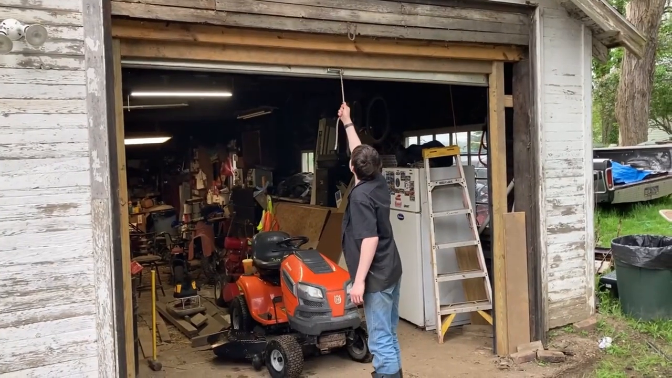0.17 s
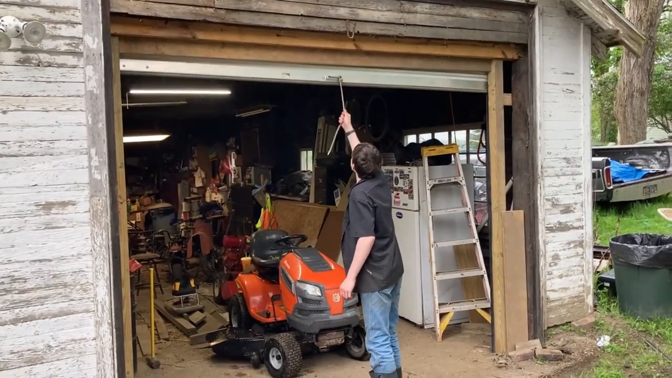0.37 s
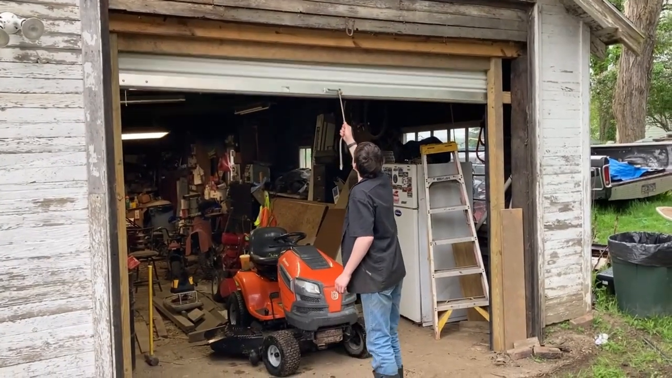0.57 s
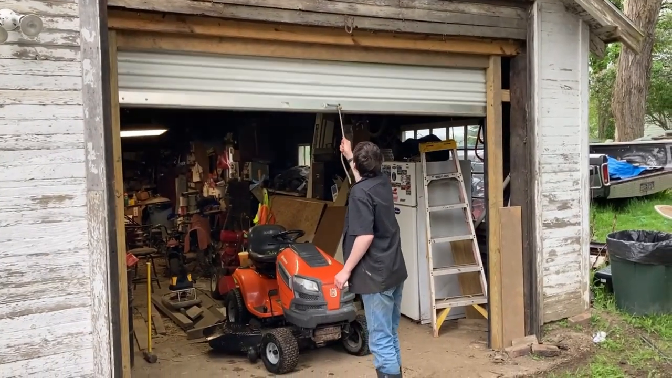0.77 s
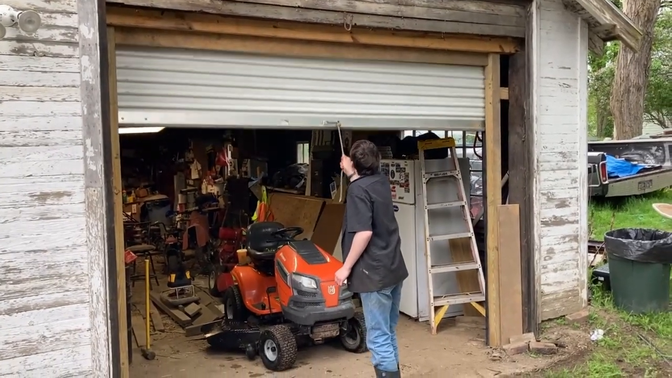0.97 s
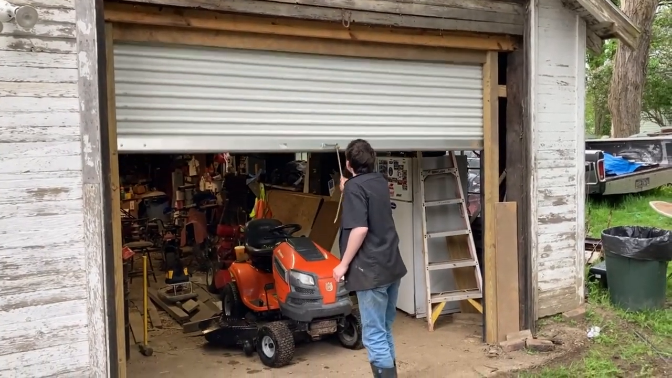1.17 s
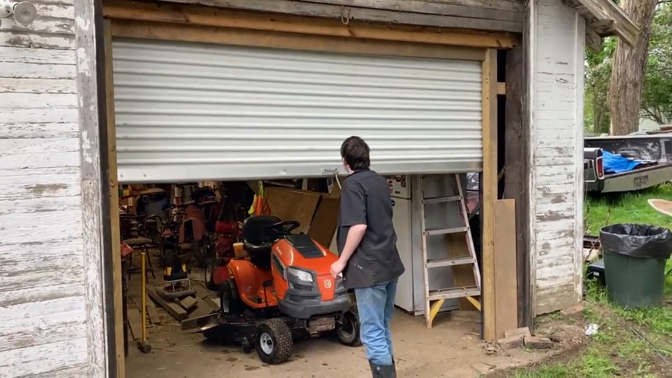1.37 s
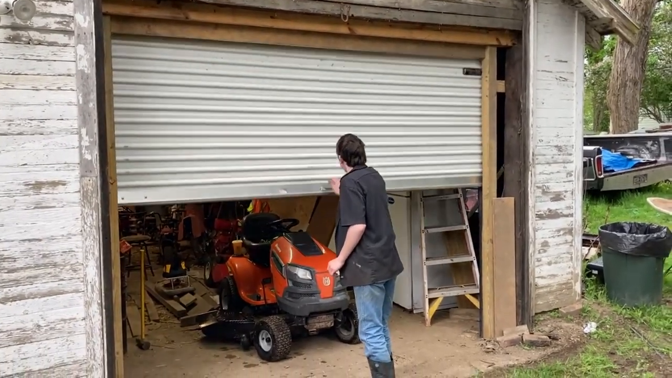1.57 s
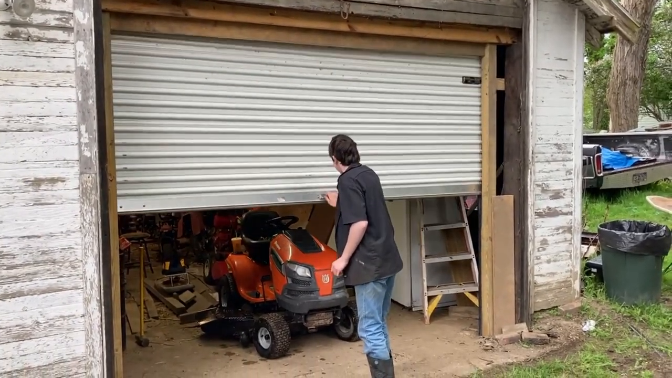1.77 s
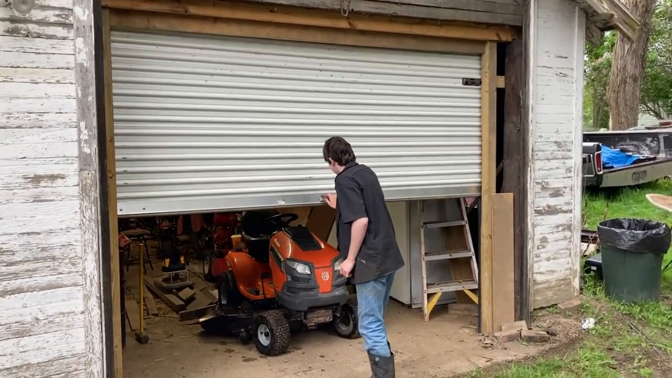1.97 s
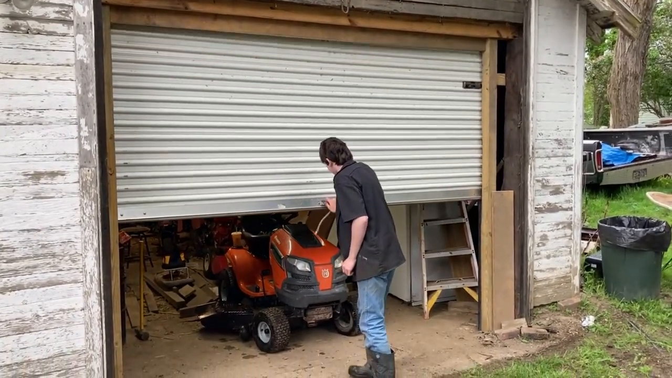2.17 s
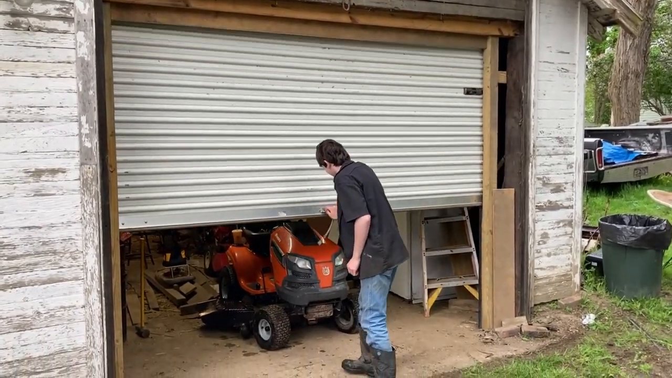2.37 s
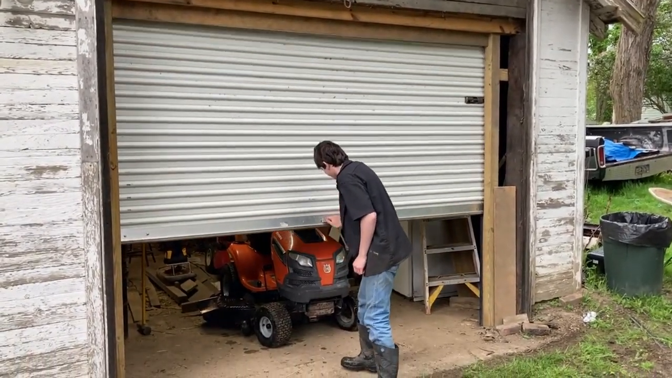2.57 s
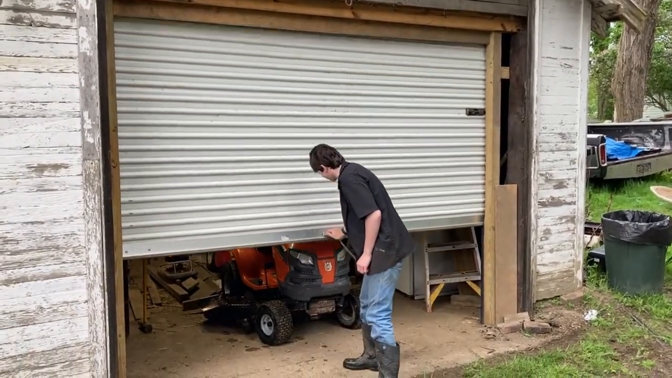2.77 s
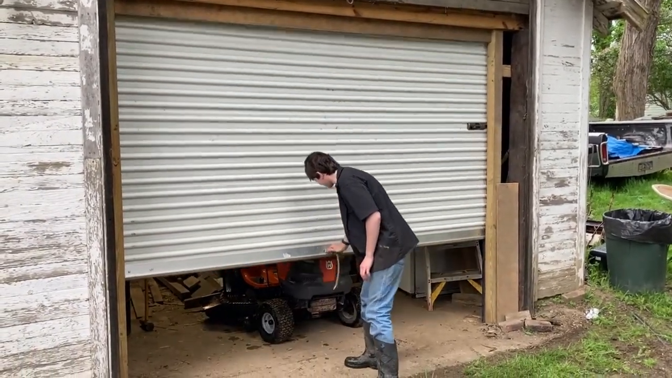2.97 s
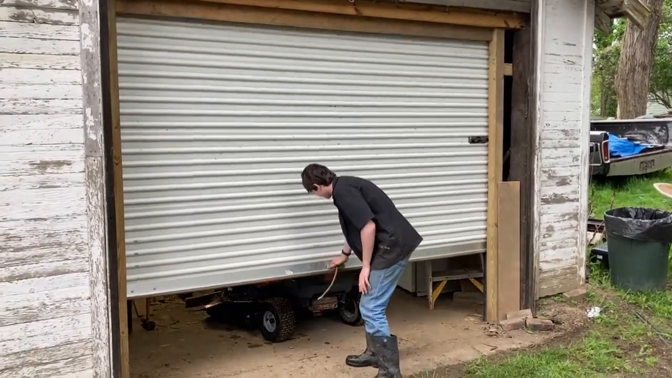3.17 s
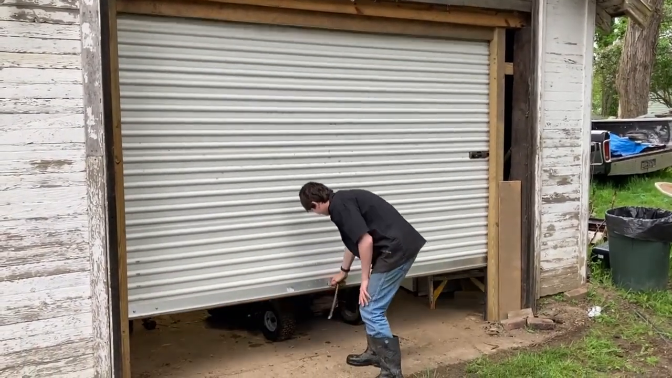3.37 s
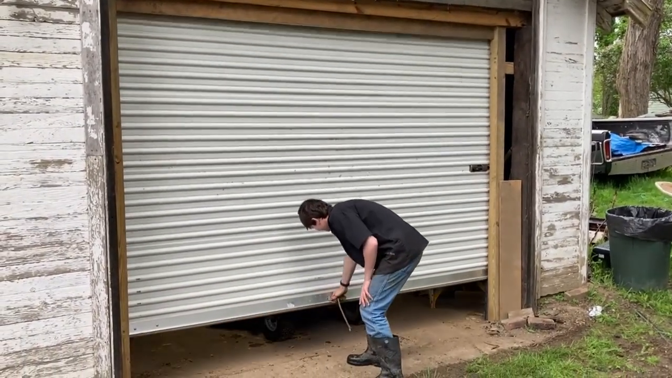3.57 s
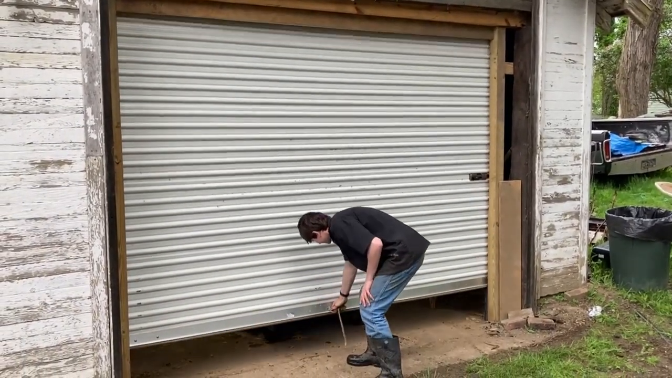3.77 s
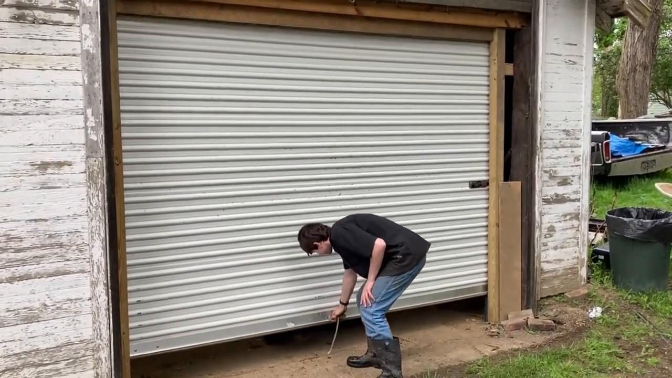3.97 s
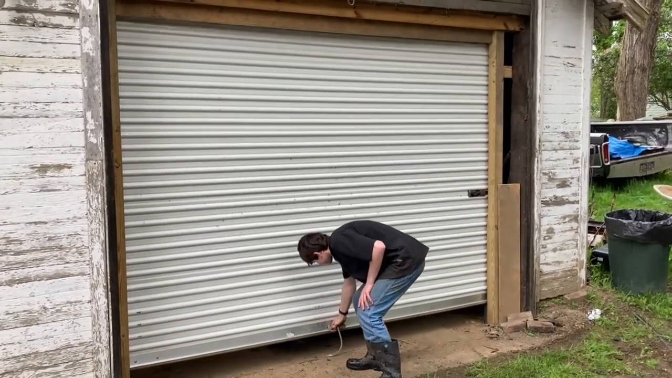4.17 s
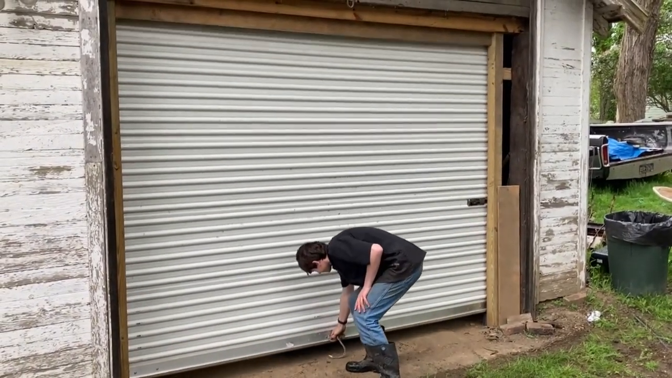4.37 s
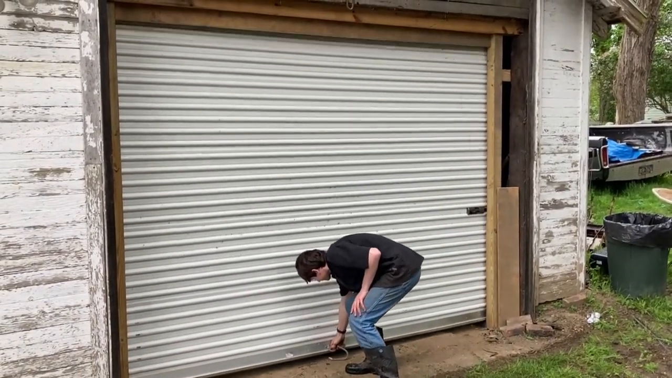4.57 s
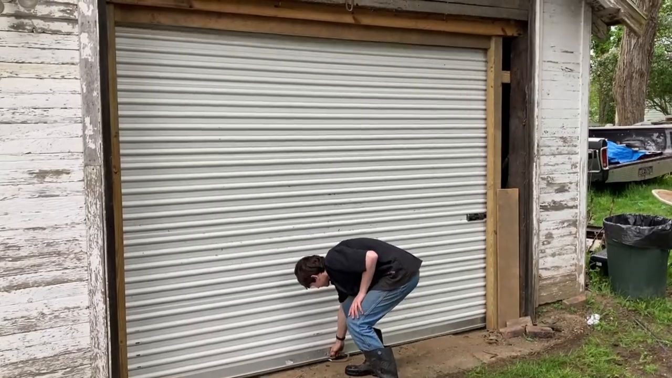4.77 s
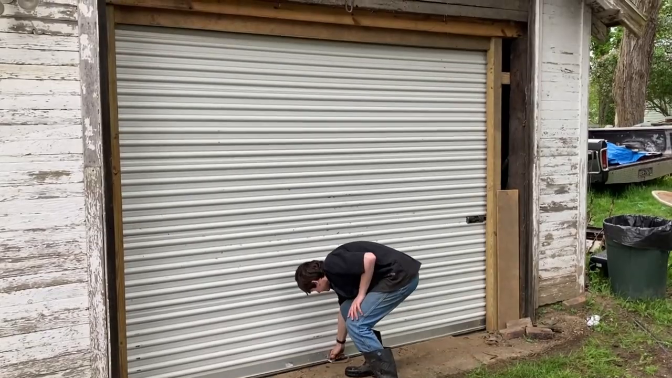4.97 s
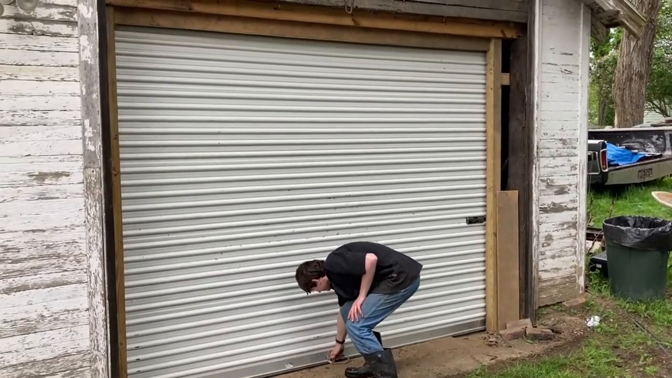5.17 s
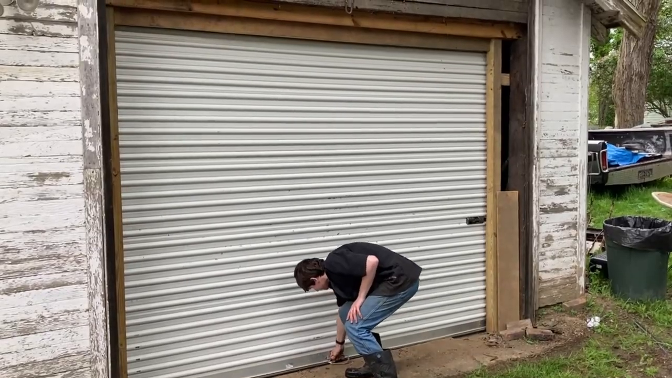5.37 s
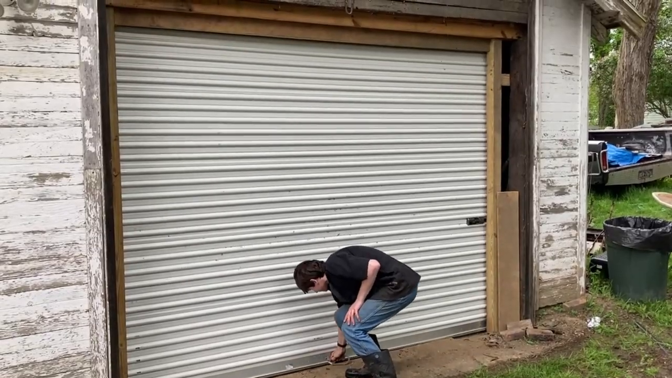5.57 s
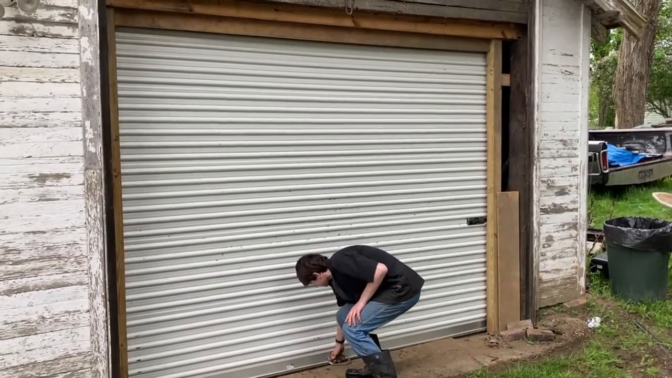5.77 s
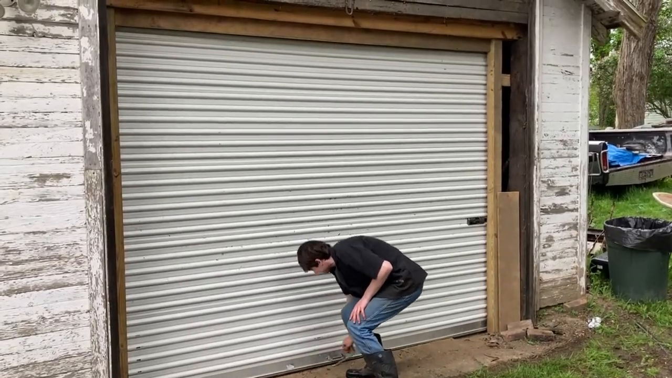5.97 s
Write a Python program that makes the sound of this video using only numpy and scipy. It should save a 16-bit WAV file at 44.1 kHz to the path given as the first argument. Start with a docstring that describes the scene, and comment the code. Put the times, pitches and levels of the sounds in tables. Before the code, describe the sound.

Outdoors, soft low air noise, faint thin metal ringing and a few tiny bird whistles open the scene. From about 0.2 s a steel roll-up door stirs with small thumps; its turning roll groans, strongest near 0.65 s. The curtain speeds up, scraping and squealing hoarsely at 0.8-1.4 s, then at 1.4-1.75 s comes a dense, loud burst of hard knocks, hollow slat notes and bright ringing clacks. A deep wobbling rumble fades under a quieter slide until 2.5 s. The second pull swells, loudest about 2.9-3.7 s: booming, rattling sheet metal, gritty high ticks, scrapes and clanks against the guides. From 3.8 s it slows and thins, with isolated knocks around 4.1, 4.4, 4.6 and 4.9 s. Short buzzing rubs and faint ticks follow at 5.2-5.7 s, with bird whistles near 5.2 and 5.8 s, ending almost quiet at 6 s.

```python
"""A corrugated steel roll-up door is pulled down in two long strokes and eased onto the ground, heard from the yard.
Random touches of its ribs in the side tracks set off decaying noise: a deep boom and a rattle of the curtain.
Its edges scrape, squeak and tick, and now and then clack against steel guides that ring in high sine tones.
The turning roll groans, loudest early in the first pull; slats ring out, and near the ground come short rubs.
Birds whistle faintly as bending sine tones, over faint metal notes and the soft, low noise of the open air."""
import sys
import numpy as np
from scipy import signal
from scipy.fft import rfft, irfft
from scipy.io import wavfile
from scipy.ndimage import uniform_filter1d

SR = 44100
rng = np.random.default_rng(int(sys.argv[2]) if len(sys.argv) > 2 else 0)


def log_audio(samples):
    """Write samples as a 16-bit WAV file to the path given in sys.argv[1]."""
    # one column per channel
    frames = np.atleast_2d(samples).T
    # limit to full scale, then quantise
    limited = np.clip(frames, -1, 1)
    pcm = np.round(limited * 32767).astype(np.int16)
    wavfile.write(sys.argv[1], SR, pcm)


N = 265482

# How hard the pull shakes the curtain. Each row: time in seconds, level of its rattle in dB before tone shaping.
SHAKE = [(0.0, -49.5), (0.27, -54.5), (1.32, -34), (1.42, -30.5), (1.48, -29.5), (1.66, -34), (1.73, -34),
         (1.87, -41.5), (1.96, -40.5), (2.15, -41), (2.2, -42.5), (2.83, -33.5), (2.98, -29), (3.24, -28),
         (3.32, -30.5), (3.42, -28), (3.65, -28), (3.8, -32.5), (3.93, -33), (4.21, -37.5), (4.58, -35),
         (4.76, -39.5), (5.05, -41.5), (5.15, -43), (5.63, -44), (6.02, -52)]
# An edge strikes a guide and chatters. Each row: start in seconds, relative level of the crack in dB,
# level of the guide's ring in dB, leading tone in Hz, time for the chatter to die down in seconds.
GUIDE_STRIKES = [(.155, -60, -73, 6660, .01), (1.227, -47, -58, 4285, .008), (1.302, -39, -48, 6660, .007),
                 (1.389, -32, -34, 7300, 0.0051), (1.397, -39, -42, 8190, .005),
                 (1.443, -19.5, -29, 8190, 0.0035), (1.5083, -26, -32, 6660, .005),
                 (1.5212, -27, -33, 7850, .006), (1.555, -26.5, -34, 7300, .005),
                 (1.594, -52, -45, 6660, .006), (1.695, -34, -56, 7300, .012),
                 (1.7219, -32, -52, 6660, .011), (1.7463, -37, -45, 7850, .011),
                 (1.911, -41, -62, 4285, .006), (1.928, -34, -45, 7850, 0.0044),
                 (2.141, -34.5, -58, 4285, 0.028), (2.689, -32.5, -39, 6660, 0.0068),
                 (2.7815, -29.5, -54, 7850, 0.042), (2.887, -27.5, -46, 7850, 0.016),
                 (2.99, -35, -42, 6660, .012), (3.024, -31, -38, 6660, .008), (3.14, -32, -35, 6660, .012),
                 (3.1566, -28, -40, 6660, 0.016), (3.181, -39, -41, 7850, .006),
                 (3.266, -48, -44, 6660, .01), (3.495, -38, -58, 8190, .005),
                 (3.518, -31.5, -36, 6660, 0.0055), (3.574, -28.5, -50, 7850, 0.0086),
                 (3.624, -38, -41, 6660, 0.0073), (3.661, -31.5, -45, 7850, 0.028),
                 (4.126, -37, -60, 7300, 0.072), (4.944, -50, -62, 8190, .008),
                 (5.166, -49, -66, 7300, 0.01), (5.21, -52, -66, 6660, .01),
                 (5.421, -56, -63, 7300, 0.0072), (5.5099, -56, -66, 7300, 0.011)]
# Tone of a bright crack. Each row: frequency in Hz, relative level in dB per Hz.
CRACK_COLOUR = [(700, -11), (1500, 23), (2800, 9.5), (4700, 14.5), (6000, -5.5), (8000, 5.5), (12000, 0),
                (16000, -4)]
# Resonances and hollows of the curtain. Each row: frequency in Hz, width in Hz, lift in dB.
CURTAIN_MODES = [(140, 14, 2), (172, 14, 3), (228, 34, 5), (291, 24, 2), (335, 40, 2), (580, 25, 3),
                 (645, 30, 2), (678, 22, 4), (738, 25, 2), (1070, 90, -3), (1192, 25, 3), (1281, 18, 7),
                 (1395, 50, 3), (1567, 22, 4), (1690, 22, 2), (1870, 90, -5), (2016, 30, 7), (2198, 24, 5)]


def from_db(db):
    """Turn decibels into a gain."""
    return 10 ** (np.asarray(db) / 20)


def rms_one(x):
    """Scale to an rms of one."""
    return x / np.sqrt(np.mean(x ** 2) + 1e-20)


def in_time(rows):
    """Draw each column of a table as a curve, sample by sample."""
    s, *columns = np.transpose(rows)
    return [np.interp(np.arange(N) / SR, s, c) for c in columns]


def at_hz(points, hz):
    """Read a table between its rows, on a log-frequency axis."""
    return np.interp(np.log(hz), np.log(np.array(points)[:, 0]), np.array(points)[:, 1])


def lowpassed(x, hz):
    """Keep the slow part of a signal, below hz."""
    return signal.sosfilt(signal.butter(2, hz, fs=SR, output="sos"), x)


def wander(hz):
    """A random drift of unit spread, no faster than about hz."""
    return rms_one(lowpassed(rng.standard_normal(N + SR), hz)[SR:])


def coloured(colour, size, envelope, count):
    """Stereo noises of third-octave bands, each band under envelope(hz, t); shape (count, 2, size)."""
    # How alike left and right are. Each row: frequency in Hz, likeness from 0 to 1.
    likeness = [(60, .95), (200, .98), (700, .93), (1000, .7), (1400, .4), (2400, .3), (4400, 0),
                (5700, .1), (7000, .9), (15000, .9)]
    edges_hz = 22 * 2 ** (np.arange(30) / 3)
    out, t = 0, np.arange(size) / SR
    white = rng.standard_normal((2, count, 2, size))   # neighbouring bands get unrelated noise
    for k, (low, high) in enumerate(zip(edges_hz, edges_hz[1:])):
        hz = np.sqrt(low * high)
        band_filter = signal.butter(2, [low, high], "band", fs=SR, output="sos")
        band = signal.sosfilt(band_filter, white[k % 2] * (envelope(hz, t) + 1e-12))
        alike = at_hz(likeness, hz)
        mid_side_power = (high - low) * np.array([[1 + alike], [1 - alike]])
        gain = from_db(at_hz(colour, hz)) * np.sqrt(mid_side_power)
        out = out + band * (gain / band.std(axis=-1, keepdims=True))
    mid, side = out[:, 0], out[:, 1]
    return rms_one(np.stack([mid + side, mid - side], axis=1))


def sheet(force, colour, modes, ring, count=6):
    """Touches land on several places, each answering with its own dying noise; all share the given modes."""
    # How long the sheet rings. Each row: frequency in Hz, seconds to fall 60 dB (multiplied by ring).
    sheet_t60 = [(60, 0.47), (250, 0.43), (1000, 0.17), (2500, 0.18), (6000, 0.17), (15000, 0.078)]

    def dying(hz, t):
        return from_db(-60 * t / (ring * at_hz(sheet_t60, hz)))

    answers = coloured(colour, SR // 4, dying, count)
    for hz, width, lift_db in modes:
        peak = signal.lfilter(*signal.iirpeak(hz, hz / width, fs=SR), answers)
        answers = answers + (from_db(lift_db) - 1) * peak
    answers = rms_one(answers) / np.sqrt(answers.shape[-1])   # unit energy gain
    place = rng.integers(0, count, N)
    return sum(signal.oaconvolve((force * (place == k))[None], answer, axes=1)[:, :N]
               for k, answer in enumerate(answers))


def contacts(per_s, spread_db):
    """Random touches of uneven strength and either sign, per_s of them a second on average."""
    sizes = from_db(spread_db * np.clip(rng.standard_normal(N), -2, 2)) * rng.choice([-1, 1], N)
    return sizes * (rng.random(N) < per_s / SR)


def steady(x, span_s):
    """Hold the power even over a span, leaving the quick grain."""
    power = np.mean(np.atleast_2d(x) ** 2, axis=0)
    for _ in range(2):
        power = uniform_filter1d(power, int(span_s * SR) + 1)
    return x / np.sqrt(np.abs(power) + 1e-4 * np.mean(power))


def blows(times, levels_db, chatter_s, chatter):
    """Each blow is one hard touch and a short chatter of random touches that die away."""
    force, t = np.zeros(N + SR), np.arange(SR // 10) / SR
    for s, db, dying_s in np.broadcast(times, levels_db, chatter_s):
        burst = chatter * rng.standard_normal(len(t)) * (rng.random(len(t)) < .03) * np.exp(-t / dying_s)
        burst[0] = 1
        at = max(int(s * SR), 0)
        force[at:at + len(t)] += from_db(db) * burst / np.linalg.norm(burst)
    return force[:N]


def shelf(x, corner_hz, low_db, high_db):
    """Set separate gains below and above a corner."""
    low = signal.sosfilt(signal.butter(1, corner_hz, fs=SR, output="sos"), x)
    return from_db(low_db) * low + from_db(high_db) * (x - low)


def resonance(force, hz, t60):
    """A unit touch sets a sine of about height 1 ringing; it falls 60 dB in t60 seconds."""
    r, w = np.exp(-np.log(1000) / (t60 * SR)), 2 * np.pi * hz / SR
    return signal.lfilter([0, np.sin(w)], [1, -2 * r * np.cos(w), r * r], force + 1e-18)


def clanks(colour, low_hz, high_hz, per_s, t60, count):
    """Random touches each set off one of count brief, dying sine tones, spread evenly in pitch."""
    touches, dealt, out = contacts(per_s, spread_db=1.0), rng.integers(0, count, N), 0
    for k, hz in enumerate(np.linspace(low_hz, high_hz, count)):
        phase = rng.normal(0, 0.053, (2, 1))   # the paths to the two sides differ
        tone = resonance(touches * (dealt == k), hz, t60)
        quarter_turn = np.roll(tone, round(SR / hz / 4))
        out = out + from_db(at_hz(colour, hz)) * (np.cos(phase) * tone + np.sin(phase) * quarter_turn)
    return steady(out, span_s=0.14)


def level(law, speed, unrolled):
    """A layer's level in dB follows the shaking, the speed and the share of the door that has left the roll."""
    firm_pull_db = -30   # rattle level that counts as a firm pull
    firm_db, per_shake, per_speed, unrolled_db = law
    shake_db = in_time(SHAKE)[0] - firm_pull_db
    return firm_db + per_shake * shake_db + per_speed * 20 * np.log10(speed) + unrolled_db * unrolled


def yard_air():
    """The open air is a steady, mostly low noise."""
    # Tone of the yard. Each row: frequency in Hz, relative level in dB per Hz.
    yard_colour = [(25, -21), (45, 3.5), (70, -2), (130, -14.5), (300, -33), (1000, -30), (2000, -39.5),
                   (3200, -39.5), (6000, -52), (16000, -58)]
    return from_db(-47.5) * coloured(yard_colour, N, lambda hz, t: 1, count=1)[0]


def lingering_ring():
    """Thin metal notes hang in the air, each a close pair of sines that beats as it fades."""
    # The faint ring. Each row: frequency in Hz, level of the first sine in dB, seconds to fall 60 dB.
    lingering_notes = [(1525, -72, 3), (2606, -75, 3), (3025, -67, 4), (3365, -74, 4), (3472, -72, 3),
                       (3736, -79, 3)]
    out, t = 0, np.arange(N) / SR
    for hz, db, t60 in lingering_notes:
        partner_hz = hz + rng.uniform(10, 20)
        pair = np.sin(2 * np.pi * hz * t) + .9 * np.sin(2 * np.pi * (partner_hz * t + rng.random()))
        out = out + from_db(db - 60 * t / t60) * pair
    return out


def curtain(speed, unrolled):
    """Ribs knock in the tracks, more often at speed; the whole sheet booms and its slats rattle."""
    # The curtain jerks and slaps. Each row: start in seconds, relative peak in dB, extra boom in dB.
    jolts = [(.154, -54, 21), (.23, -36.5, 12), (.415, -30, -14), (.674, -38, 2), (.818, -29, 14),
             (1.145, -19.5, 9.5), (1.394, -21, 4), (1.446, -26, 19), (1.474, -16, 2), (1.553, -23.5, 13.5),
             (1.592, -17.5, 11), (1.683, -17.5, 10), (2.55, -21, 5), (2.926, -14, 7.5), (2.972, -17, 11),
             (3.014, -15, 7), (3.064, -23, 0), (3.224, -13.5, -10), (3.357, -15, 8), (3.416, -15.5, 10.5),
             (3.522, -20, 13.5), (3.574, -15.5, 11), (3.598, -22, 12), (3.665, -15, -1), (3.918, -17, -12),
             (4.458, -33, 4), (4.581, -22, -14), (4.899, -23, 8), (5.193, -26, -10), (5.299, -31, 6),
             (5.444, -26, -12), (5.545, -26, -6)]
    # Tones of boom and rattle. Each row: frequency in Hz, relative level in dB per Hz.
    boom_colour = [(30, -51), (50, -10.5), (75, -1.5), (120, -4.5), (160, -1.5), (210, -2), (290, -1),
                   (380, -8), (470, -12), (650, -16.5), (2000, -105)]
    rattle_colour = [(300, -35), (450, -4), (620, 0), (800, -4), (1000, -6.5), (1400, -7.5), (2000, -15),
                     (2500, -22), (3200, -73), (5000, -51), (9000, -81)]
    # Boom level. In order: relative level in dB under a firm pull at 1 m/s with the door rolled up,
    # dB per dB of shake, dB per dB of speed, dB gained once fully unrolled.
    boom_law = (-28.5, 0.8873, 0.0023, 3.5)
    boom_db, rattle_db = level(boom_law, speed, unrolled), in_time(SHAKE)[0]
    s, peak_db, extra_boom_db = np.transpose(jolts)
    # the curtain is quieter until the first tug
    tugged = np.clip((np.arange(N) / SR - s[0]) / 0.0064, from_db(-11), 1)

    knocks = steady(contacts(130 + 130 * speed, spread_db=4.5), span_s=0.059)
    boom = steady(sheet(knocks, boom_colour, CURTAIN_MODES, ring=1.0, count=6), span_s=1.0)
    boom = tugged * from_db(boom_db) * boom
    wash = sheet(knocks, rattle_colour, CURTAIN_MODES, ring=2.55, count=8)
    slats = from_db(-3.5) * clanks(rattle_colour, 650, 2200, per_s=110, t60=.1, count=40)
    rattle = tugged * from_db(rattle_db) * steady(wash + slats, span_s=0.02)

    boom_blows = blows(s, peak_db + extra_boom_db, chatter_s=0.012, chatter=0.46)
    boom += from_db(13) * sheet(boom_blows, boom_colour, CURTAIN_MODES, ring=0.57, count=2)
    rattle_blows = blows(s, peak_db, chatter_s=0.0083, chatter=0.099)
    rattle += from_db(15) * sheet(rattle_blows, rattle_colour, CURTAIN_MODES, ring=1.0, count=4)
    # the more steel hangs free of the roll, the deeper it booms
    boom = shelf(boom, corner_hz=147, low_db=-10.5 + 15.84 * unrolled, high_db=2.5 - 5.9 * unrolled)
    # slow knocks are softer, and so duller; the nearer track, on the left, is the brighter
    left_db = 1.24 * np.array([[1], [-1]])
    rattle_high_db = -1.5 + 3.6 * speed + left_db
    return boom + shelf(rattle, corner_hz=1190, low_db=1.0 - 1.1 * speed, high_db=rattle_high_db)


def edges(speed, unrolled):
    """Slipping edges: a gritty scrape and a fine hiss, each mixed with brief, faint sines at random moments."""
    # Tones of scrape and hiss. Each row: frequency in Hz, relative level in dB per Hz.
    scrape_colour = [(1500, -47), (2500, 4), (3400, 7), (4200, 3), (5000, -23), (6000, 4), (7500, -38),
                     (12000, -55)]
    hiss_colour = [(4500, 2), (6300, 1.5), (7500, -0.5), (9500, -2.5), (12500, -4), (16000, -10.5)]
    # Resonances of the tracks. Each row: frequency in Hz, width in Hz, lift in dB.
    track_modes = [(4250, 47, 2.2), (4780, 350, 21.3)]
    # Scrape and hiss levels. In order: relative level in dB under a firm pull at 1 m/s with the door
    # rolled up, dB per dB of shake, dB per dB of speed, dB gained once fully unrolled.
    scrape_law = (-41, 1, 0.36, -2)
    hiss_law = (-43, 0.44, 1.06, -0.5)
    binding_db = 3 * wander(42)   # the edges bind and run free by turns
    scrape_db = level(scrape_law, speed, unrolled) + binding_db
    hiss_db = level(hiss_law, speed, unrolled) + binding_db

    slips = steady(contacts(170 + 600 * speed, spread_db=0.5), span_s=0.028)
    scrape_force = slips * (from_db(scrape_db) + rubbing()[1])
    scrape = sheet(scrape_force, scrape_colour, track_modes, ring=0.68, count=5)
    scrape += from_db(scrape_db - 8) * clanks(scrape_colour, 3900, 5600, per_s=150, t60=.03, count=16)
    # a slow edge rubs more thinly
    scrape = shelf(scrape, corner_hz=3420, low_db=-32 + 1.2 * speed, high_db=0.26)
    hiss = sheet(slips * from_db(hiss_db), hiss_colour, [], ring=1.0, count=3)
    hiss += from_db(hiss_db - 8) * clanks(hiss_colour, 6700, 13000, per_s=330, t60=.025, count=36)
    return scrape + hiss


def birds():
    """Thin whistles that bend through three pitches and flutter on their way through the trees."""
    # Each row: start in seconds, length in seconds, start, middle and end pitch in Hz, level in dB.
    bird_notes = [(.05, .09, 3380, 3365, 3380, -64), (.195, .05, 3000, 3020, 3020, -63),
                  (.255, .09, 3020, 3025, 3030, -60), (5.163, .042, 3700, 3300, 3170, -54),
                  (5.265, .135, 2445, 2445, 2440, -53.5), (5.768, .038, 3340, 3215, 3235, -54),
                  (5.803, .022, 3250, 3420, 3720, -57)]
    out = np.zeros(N + SR)
    for s, length, start_hz, middle_hz, end_hz, db in bird_notes:
        u = np.linspace(0, 1, int(length * SR))
        hz = np.polyval(np.polyfit([0, .5, 1], [start_hz, middle_hz, end_hz], 2), u)
        swell = np.sqrt(np.abs(np.sin(np.pi * u)))
        at = int(s * SR)
        out[at:at + len(u)] += from_db(db) * swell * np.sin(2 * np.pi * np.cumsum(hz) / SR)
    notes = out[:N] * from_db(2 * wander(35))
    return notes + from_db(-14) * sheet(notes, CRACK_COLOUR, [], ring=3, count=1)


def coil():
    """The turning roll groans in a few narrow resonances, loudest early in the first pull, fading in the second."""
    # How loud the groan is. Each row: time in seconds, level in dB.
    coil_level = [(.12, -63), (.23, -56.5), (.35, -54.5), (.42, -51.5), (.53, -49), (.65, -45.5),
                  (1.2, -56), (2.2, -50), (4.0, -75)]
    # Tone of the groan. Each row: frequency in Hz, relative level in dB per Hz.
    coil_colour = [(600, -25), (1200, -2), (2000, 0), (2600, -4.5), (3800, -0.5), (5000, -22), (9000, -45)]
    # Resonances of the roll. Each row: frequency in Hz, width in Hz, lift in dB.
    coil_modes = [(1275, 60, 10), (1540, 70, 11), (1990, 40, 8), (2195, 40, 6)]
    slips = steady(contacts(300, spread_db=9), span_s=0.033)
    return sheet(slips * from_db(in_time(coil_level)[0]), coil_colour, coil_modes, ring=1.3, count=3)


def guide_ring():
    """The guides ring in a few clear, high modes; each strike brings one forward and shifts them all a little."""
    # Ring of the guides. Each row: frequency in Hz, dB relative to the leading mode, seconds to fall 60 dB.
    guide_modes = [(4285, -14, .1), (6660, -8, .085), (7300, -13, .06), (7760, -11, .08), (7850, -8, .1),
                   (8190, -10, .07), (8790, -9, .07), (11020, -9, .1), (11755, -8, .09), (12660, -10, .08),
                   (15300, -14, .05)]
    scatter_hz, rise_share = 38, .2   # spread of a mode between strikes; swell as a share of the chatter
    out, t = np.zeros(N + SR), np.arange(SR // 5) / SR
    hz, mode_db, t60 = np.transpose(guide_modes)[:, :, None]
    for s, _, ring_db, lead_hz, chatter_s in GUIDE_STRIKES:
        detune, uneven, phase = rng.standard_normal((3, len(hz), 1))
        db = mode_db + 2 * uneven
        db[np.argmin(np.abs(hz - lead_hz))] = 0
        modes = from_db(db - 60 * t / t60) * np.sin(2 * np.pi * ((hz + scatter_hz * detune) * t + phase))
        swell = 1 - np.exp(-t / (rise_share * chatter_s))
        at = int(s * SR)
        out[at:at + len(t)] += from_db(ring_db) * swell * modes.sum(axis=0)
    return out[:N]


def clacks():
    """A strike on a guide gives a bright crack and sets the guide ringing."""
    s, peak_db, _, _, chatter_s = np.transpose(GUIDE_STRIKES)
    crack = sheet(blows(s, peak_db, chatter_s, chatter=0.55), CRACK_COLOUR, [], ring=0.88, count=3)
    return from_db(24) * crack + guide_ring()


def slat_rings():
    """A jarred slat swells quickly into one hollow note and dies away, a little out of step on the two sides."""
    # Each row: start in seconds, pitch in Hz, relative level in dB.
    jarred_slats = [(0.412, 1244, -40.5), (.625, 1990, -42), (1.138, 1291, -36), (1.2, 628, -29),
                    (1.368, 1393, -27.5), (1.38, 1140, -34), (1.439, 648, -18), (1.45, 1557, -27),
                    (1.472, 604, -23), (1.477, 1390, -20), (1.547, 846, -23), (1.631, 1670, -30.5),
                    (1.682, 683, -21), (1.682, 1272, -29), (1.735, 1414, -29), (2.534, 617, -29),
                    (2.714, 700, -27), (2.964, 1276, -29), (2.966, 1392, -28), (3.007, 679, -18),
                    (3.076, 1372, -21.5), (3.213, 1626, -23.5), (3.352, 1674, -27), (3.466, 671, -19.5),
                    (3.547, 660, -27), (3.569, 1180, -22.5), (3.614, 620, -31), (3.669, 1367, -35),
                    (3.724, 668, -16), (3.8, 679, -25), (3.924, 653, -35), (4.577, 1110, -33),
                    (5.222, 674, -32)]
    rise_s, t60_s = 0.0083, 0.15
    out, t = np.zeros((2, N + SR)), np.arange(SR // 3) / SR
    envelope = (1 - np.exp(-t / rise_s)) * from_db(-60 * t / t60_s)
    phases = rng.normal(0, 0.13, (len(jarred_slats), 2, 1))
    for (s, hz, db), phase in zip(jarred_slats, phases):
        at = int(s * SR)
        out[:, at:at + len(t)] += from_db(db) * envelope * np.sin(2 * np.pi * hz * t + phase)
    return out[:, :N]


def ticks():
    """An edge that slips gives a short, gritty tick that sags in pitch as it dies."""
    # Each row: start in seconds, pitch in Hz that it sags to, relative peak in dB.
    tick_rows = [(0.619, 4250, -35), (1.708, 4590, -34), (2.164, 4540, -32), (2.69, 4370, -47),
                 (2.8874, 4820, -18.5), (2.977, 4800, -23), (3.1597, 4700, -22), (3.222, 4630, -24),
                 (3.244, 4500, -26), (3.362, 4470, -23.5), (3.402, 5030, -34), (3.4163, 4610, -23),
                 (3.494, 4800, -19.5), (3.573, 4590, -23), (3.666, 4730, -26), (3.8196, 4750, -33),
                 (3.896, 4430, -29.5), (4.124, 4580, -30.5), (4.2881, 4640, -35), (4.384, 4650, -37),
                 (5.04, 4480, -41), (5.092, 4960, -47), (5.1666, 5070, -44), (5.425, 4610, -39.5),
                 (5.49, 4460, -40), (5.7447, 4570, -44.5), (5.906, 4630, -49), (5.955, 4620, -47)]
    out, t = np.zeros(N + SR), np.arange(SR // 20) / SR
    age = t / 0.0022   # a tick peaks after 2.2 ms
    grit = 0.85 * wander(320)   # random phase, in radians
    for s, hz, db in tick_rows:
        at = int(s * SR)
        phase = 2 * np.pi * np.cumsum(hz * (1 + 0.089 * np.exp(-age))) / SR
        wave = np.sin(phase + np.roll(grit, -at)[:len(t)])
        out[at:at + len(t)] += from_db(db) * age * np.exp(1 - age) * wave
    # the shed wall scatters each tick
    scattered = sheet(out[:N], CRACK_COLOUR, [], ring=1.0, count=1)
    return from_db(-8.5) * out[:N] + from_db(-10.5) * scattered


def squeal():
    """Friction sets an edge singing hoarsely on the first fast pull: a tone roughened by slow noise."""
    # Each row: time in seconds, pitch in Hz, relative level in dB.
    squeal_curve = [(.72, 4750, -80), (.77, 4700, -55), (.815, 4650, -48.5), (.87, 4540, -49.5),
                    (.91, 4760, -50), (.95, 4700, -51), (.99, 4800, -59), (1.04, 4920, -49),
                    (1.11, 4840, -49.5), (1.2, 4750, -55), (1.3, 4800, -51), (1.42, 4750, -53),
                    (1.5, 4750, -100)]
    pitch_hz, squeal_db = in_time(squeal_curve)
    pitch_hz = pitch_hz + 55 * wander(30)   # wavers by about 55 Hz
    rough = lowpassed(rng.standard_normal((2, 2, N)), 125)
    tone = np.exp(2j * np.pi * np.cumsum(pitch_hz) / SR)
    hoarse = rms_one(np.real((rough[0] + 1j * rough[1]) * tone))
    return from_db(squeal_db + 3) * hoarse


def hard_knocks():
    """A rib that catches in the track and lets go gives one hard, dry knock."""
    # Each row: start in seconds, relative peak in dB.
    rib_catches = [(1.398, -19), (1.447, -14), (1.478, -13), (1.49, -17), (1.501, -14), (1.53, -20),
                   (1.556, -18), (1.592, -18), (1.684, -16), (1.745, -24), (2.889, -21), (2.975, -13),
                   (3.014, -18), (3.083, -21), (3.163, -18), (3.222, -14), (3.363, -17), (3.416, -17),
                   (3.495, -18), (3.574, -13), (3.598, -15), (3.66, -19), (3.9, -23), (4.125, -27),
                   (4.383, -28), (4.581, -25), (4.9, -27)]
    # Tone of a knock. Each row: frequency in Hz, relative level in dB per Hz.
    knock_colour = [(150, -16), (300, 2), (650, 1), (1000, -4), (1400, 0), (2000, -10), (2600, -30),
                    (5000, -28), (9000, -50)]
    s, peak_db = np.transpose(rib_catches)
    force = blows(s, peak_db, chatter_s=.003, chatter=.15)
    return from_db(15) * sheet(force, knock_colour, CURTAIN_MODES, ring=.25, count=4)


def sway():
    """Checked at the end of the first pull, the hanging curtain wobbles with a deep, dying rumble."""
    start_s, start_db, t60_s = 1.46, -39, 4.1
    age = np.maximum(np.arange(N) / SR - start_s, 0)
    low_band = signal.butter(2, (45, 110), "band", fs=SR, output="sos")
    rumble = rms_one(signal.sosfilt(low_band, rng.standard_normal(N)))
    fade_in = np.minimum(age / 0.028, 1)
    return from_db(start_db - 60 * age / t60_s) * fade_in * steady(rumble, span_s=0.12)


def rubbing():
    """Each rub starts firmly and eases off; returns gains for the slats and for the edges."""
    # Short rubs near the ground, with rests between. Each row: start in seconds, length in seconds,
    # level of the slats in dB, relative level of the edges in dB.
    rub_rows = [(4.885, .07, -42, -61), (5.178, .075, -38, -64), (5.287, .07, -39, -70),
                (5.398, .085, -39.5, -64), (5.505, .075, -40, -59), (5.605, .055, -41, -78),
                (5.675, .04, -47, -69)]
    out, t = 0, np.arange(N) / SR
    for s, length, slats_db, edges_db in rub_rows:
        shape = np.interp((t - s) / length, [0, .15, .6, 1], [0, 1, .8, 0])
        out = out + from_db([[slats_db], [edges_db]]) * shape
    return out


def rubs():
    """A rub is a run of tiny slips that buzzes in the slats."""
    # Tone of a rub. Each row: frequency in Hz, relative level in dB per Hz.
    rub_colour = [(300, -12), (650, 4), (900, -2), (1500, 1), (1850, -8), (2100, -6), (2500, -36),
                  (3500, -36), (12000, -55)]
    slips = steady(contacts(300, spread_db=4), span_s=0.02)
    return sheet(rubbing()[0] * slips, rub_colour, CURTAIN_MODES, ring=0.27, count=3)


def scene():
    """The door's travel drives its sounds; the birds and the open air are added."""
    # Two pulls with a change of grip between them, then a creep onto the ground.
    # Each row: time in seconds, speed in metres per second.
    travel = [(0, 0.0056), (.3, 0.089), (.55, 0.45), (.85, 1.11), (1.45, 1.1), (1.66, 0.31), (1.86, 0.15),
              (2.02, 0.28), (2.3, 0.56), (2.6, 0.55), (3.0, 0.9), (3.66, 0.5), (3.78, 0.28), (4.2, 0.23),
              (4.9, 0.34), (5.01, 0.092), (5.14, 0.034), (5.6, 0.0064), (6.02, 0.0093)]
    speed = np.maximum(in_time(travel)[0], 1e-3)
    unrolled = np.cumsum(speed) / np.sum(speed)   # share of the door off the roll, 0 to 1
    door = curtain(speed, unrolled) + edges(speed, unrolled) + coil() + clacks() + slat_rings()
    door = door + ticks() + squeal() + hard_knocks() + sway() + rubs()
    return yard_air() + lingering_ring() + door + birds()


def record(dry):
    """The door is a little to the left, but its high treble reaches the left channel late; the top is cut."""
    left_lead_s, treble_lag_s, treble_from_hz = .000055, .000275, 5560
    cutoff_hz, fade_s = 15850, .008
    margin = SR // 10
    left = np.pad(dry[0], margin, "linear_ramp")
    hz = np.arange(len(left) // 2 + 1) * SR / len(left)
    # shift the left channel in time by turning the phase of each frequency
    turn = np.exp(2j * np.pi * (left_lead_s * hz - treble_lag_s * np.maximum(hz - treble_from_hz, 0)))
    shifted = irfft(rfft(left) * turn, len(left))[margin:-margin]
    pair = np.array([shifted, dry[1]])
    fade = np.minimum(np.arange(N)[::-1] / (fade_s * SR), 1)   # a short fade at the end
    return signal.sosfilt(signal.ellip(12, .2, 80, cutoff_hz, fs=SR, output="sos"), pair * fade)


dry = scene()
out = record(dry)
log_audio(out)
```